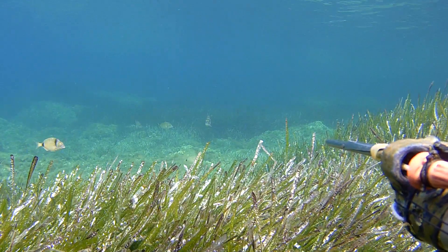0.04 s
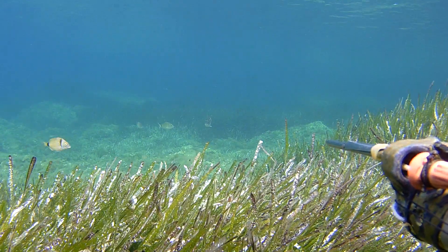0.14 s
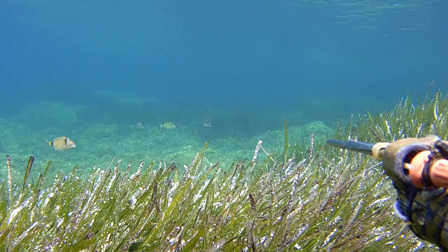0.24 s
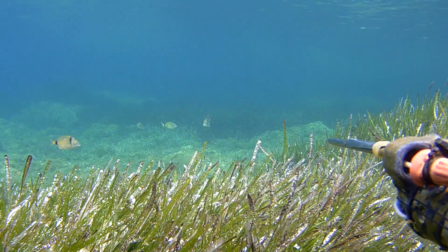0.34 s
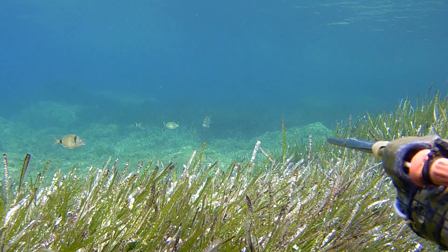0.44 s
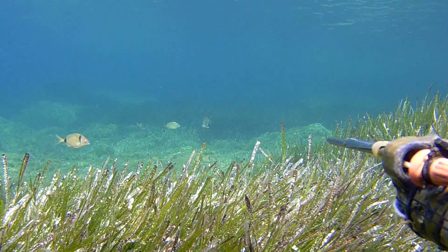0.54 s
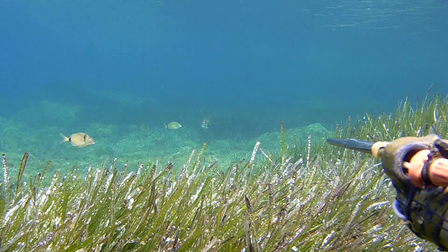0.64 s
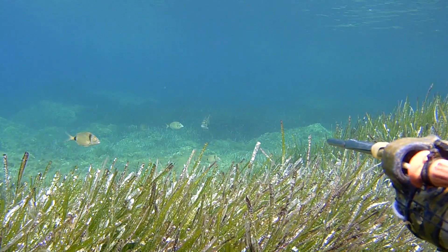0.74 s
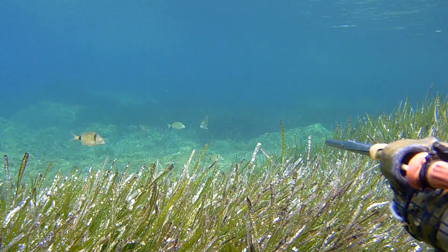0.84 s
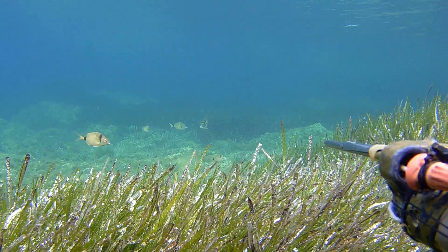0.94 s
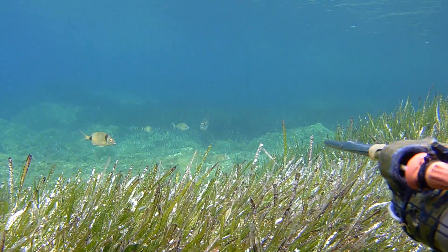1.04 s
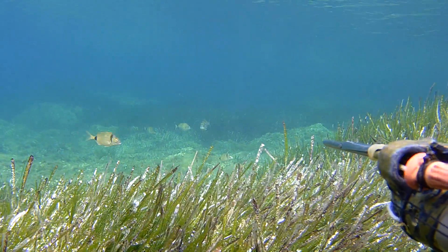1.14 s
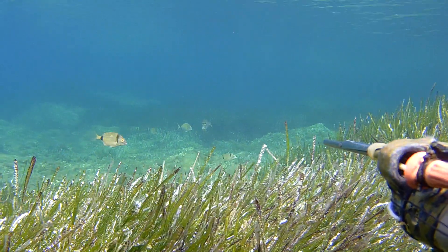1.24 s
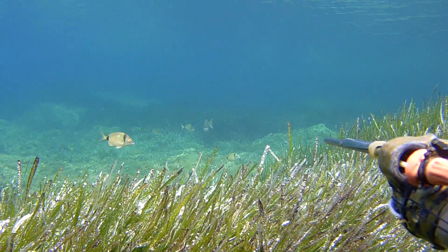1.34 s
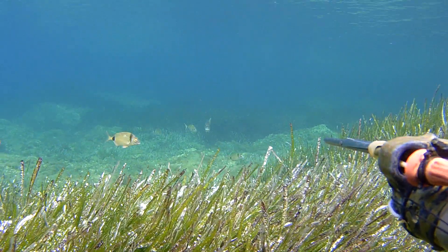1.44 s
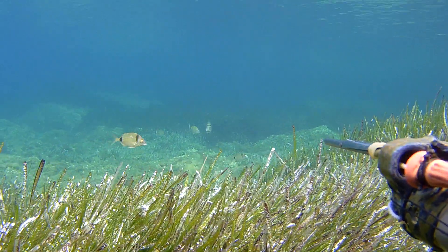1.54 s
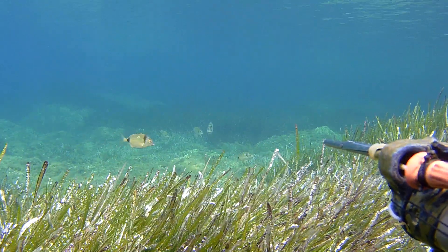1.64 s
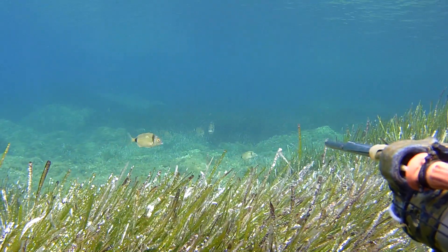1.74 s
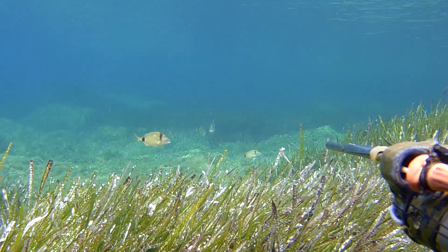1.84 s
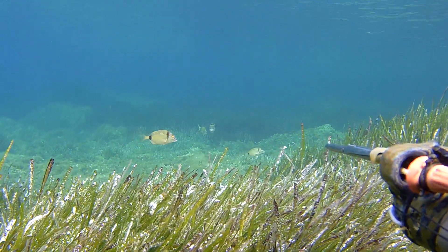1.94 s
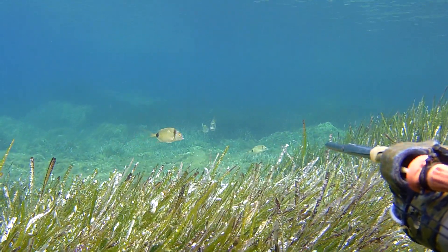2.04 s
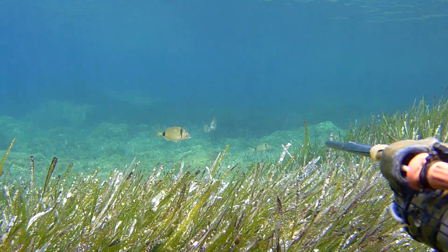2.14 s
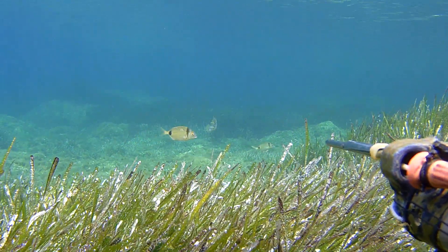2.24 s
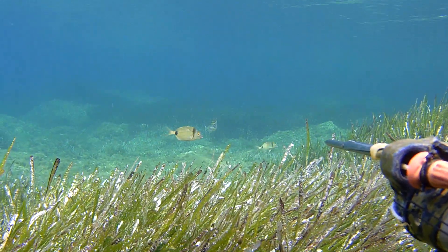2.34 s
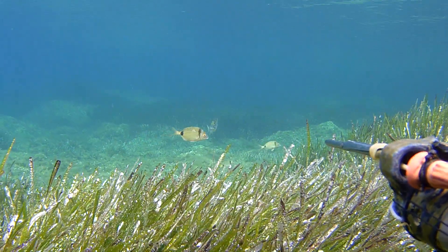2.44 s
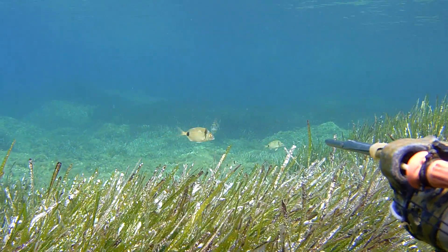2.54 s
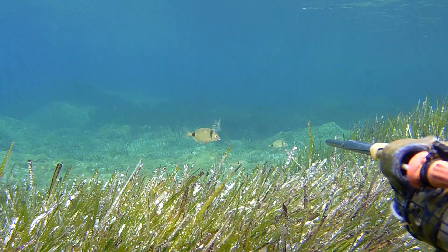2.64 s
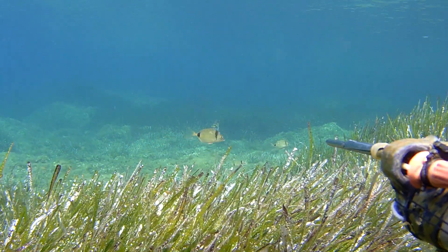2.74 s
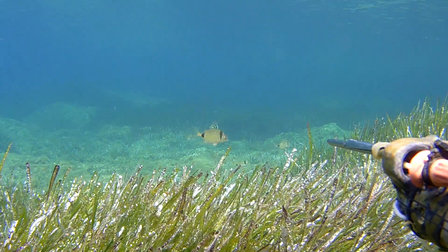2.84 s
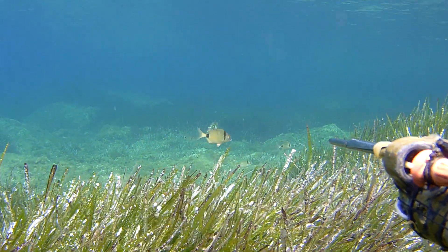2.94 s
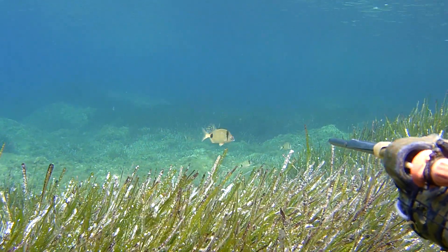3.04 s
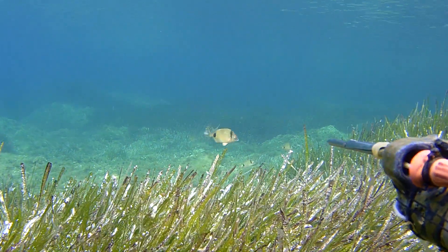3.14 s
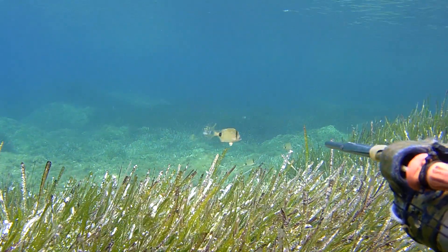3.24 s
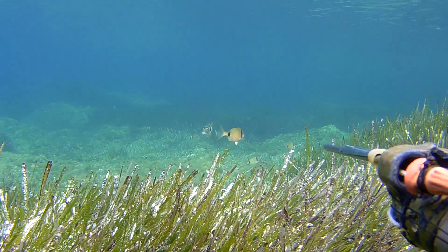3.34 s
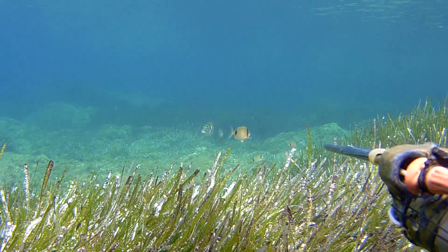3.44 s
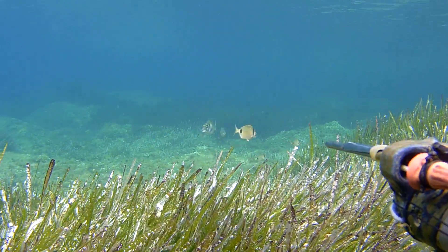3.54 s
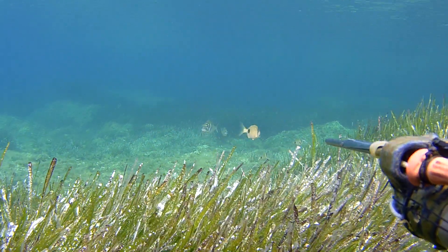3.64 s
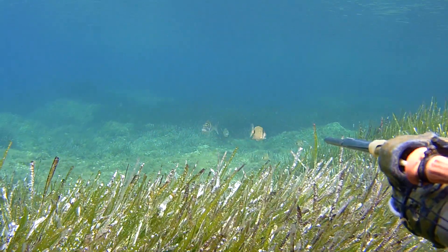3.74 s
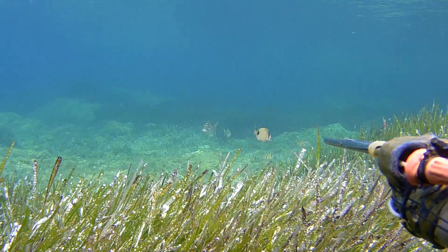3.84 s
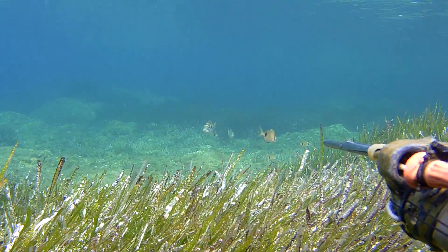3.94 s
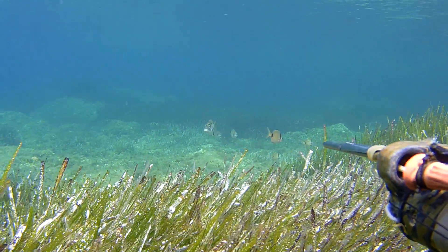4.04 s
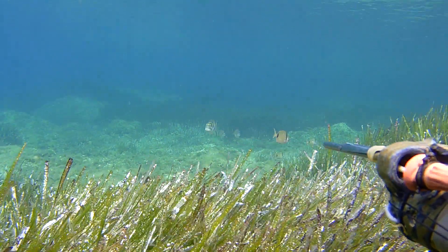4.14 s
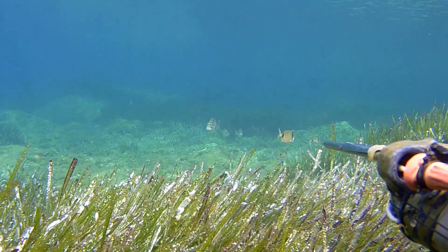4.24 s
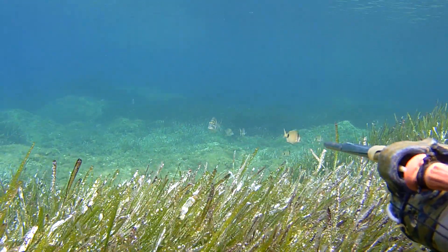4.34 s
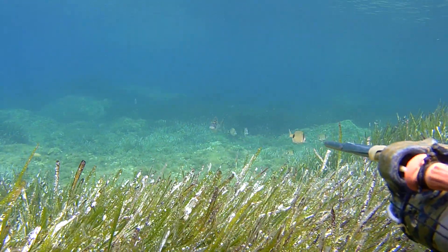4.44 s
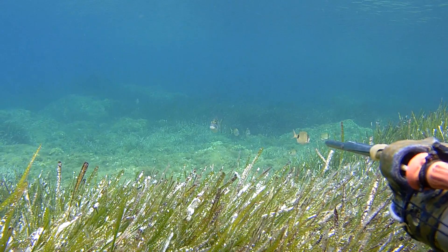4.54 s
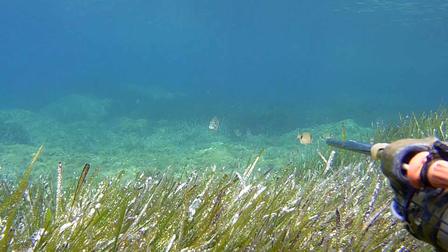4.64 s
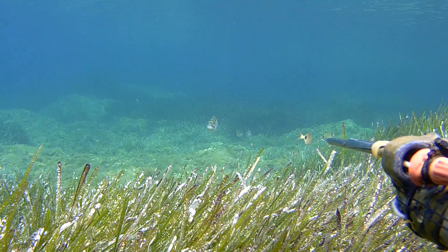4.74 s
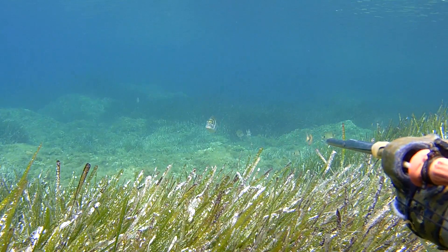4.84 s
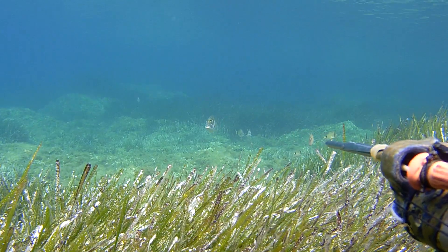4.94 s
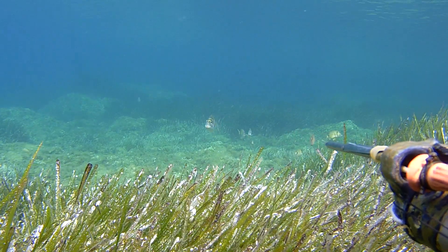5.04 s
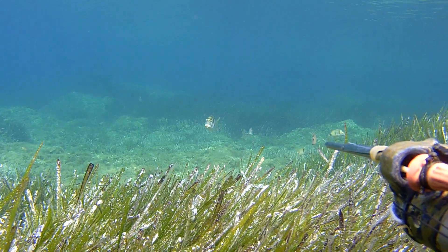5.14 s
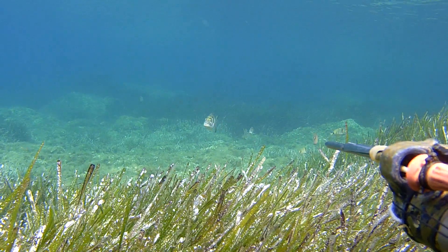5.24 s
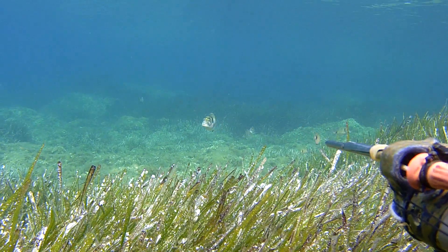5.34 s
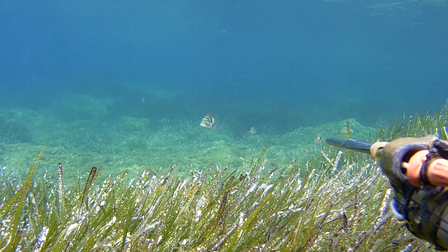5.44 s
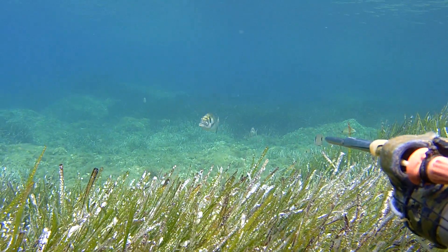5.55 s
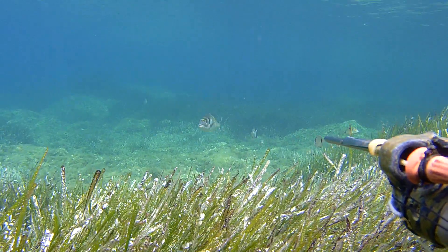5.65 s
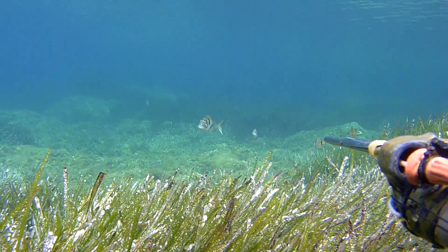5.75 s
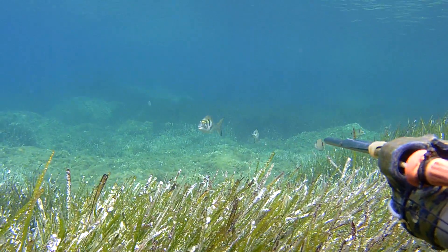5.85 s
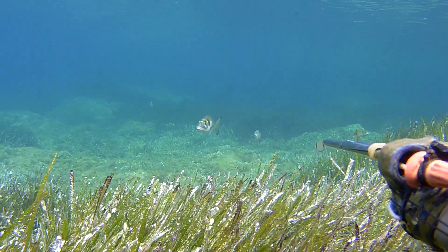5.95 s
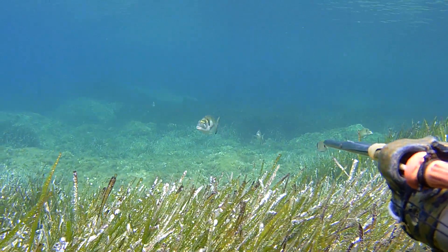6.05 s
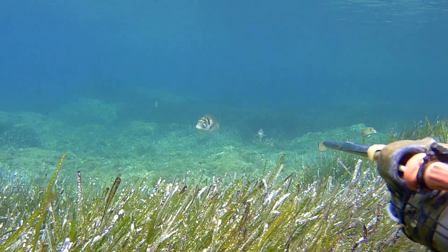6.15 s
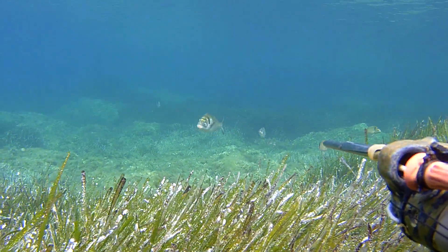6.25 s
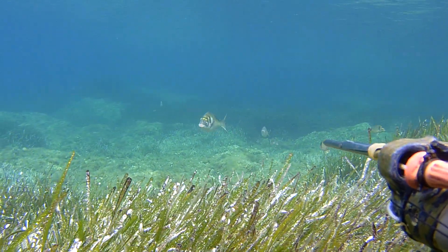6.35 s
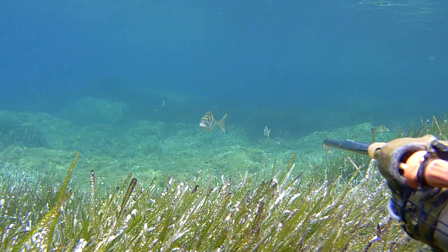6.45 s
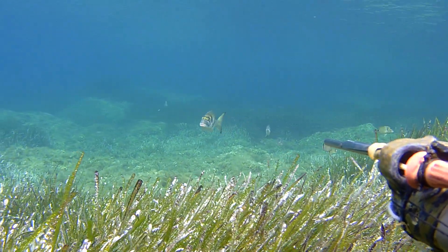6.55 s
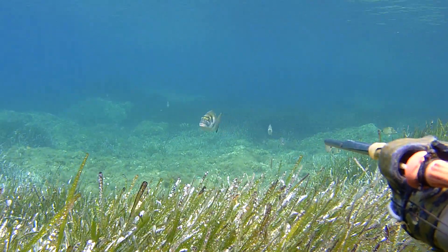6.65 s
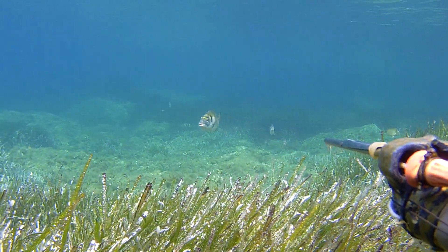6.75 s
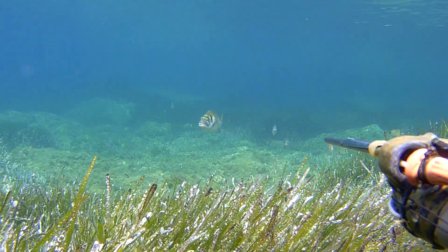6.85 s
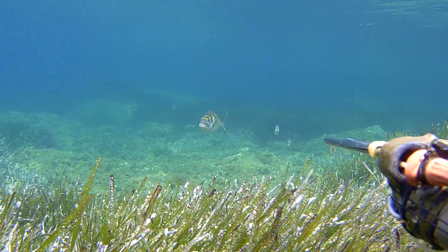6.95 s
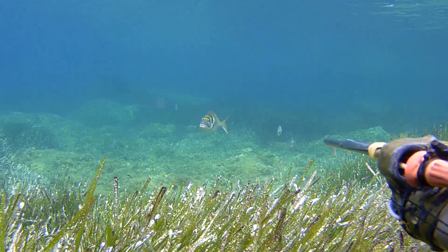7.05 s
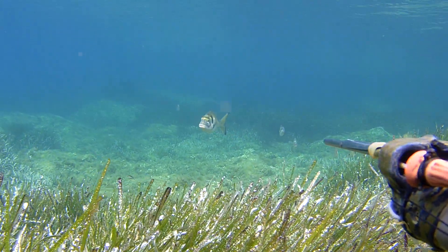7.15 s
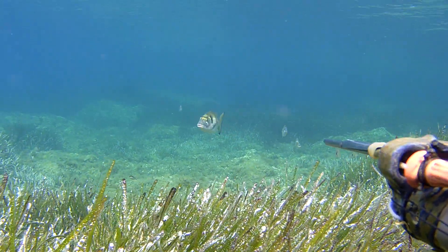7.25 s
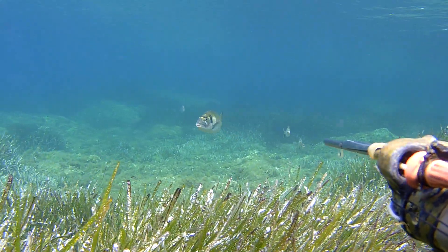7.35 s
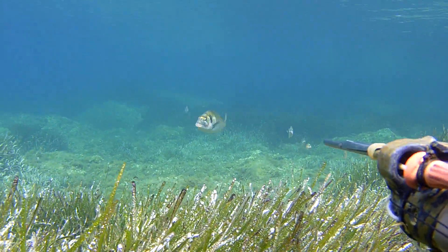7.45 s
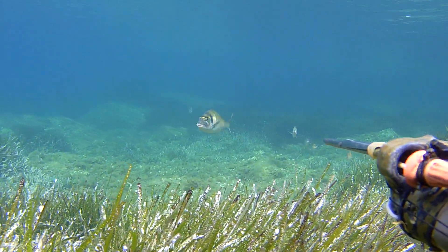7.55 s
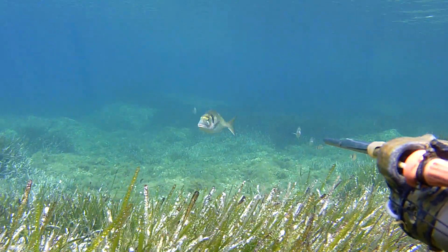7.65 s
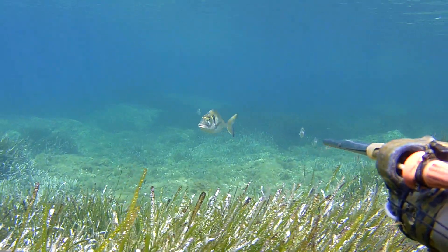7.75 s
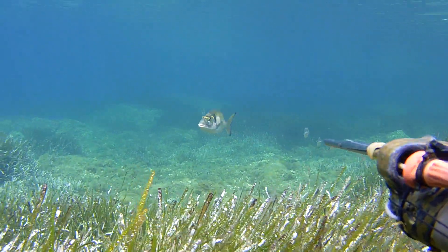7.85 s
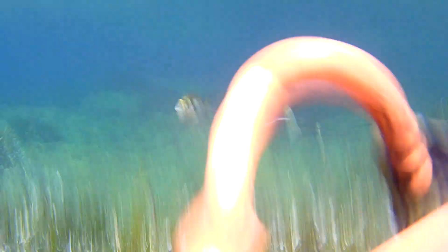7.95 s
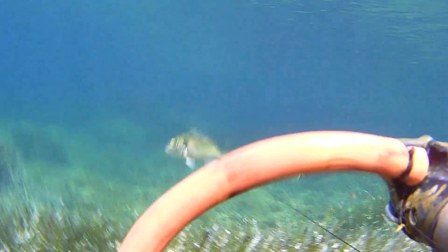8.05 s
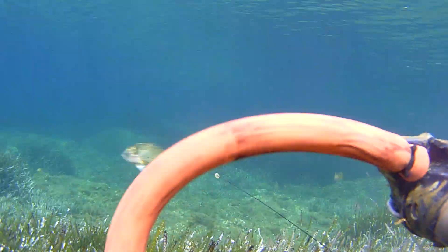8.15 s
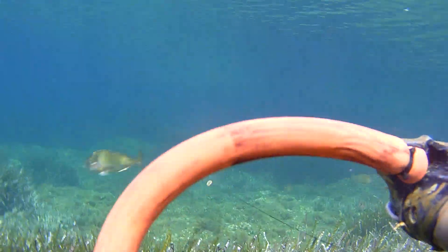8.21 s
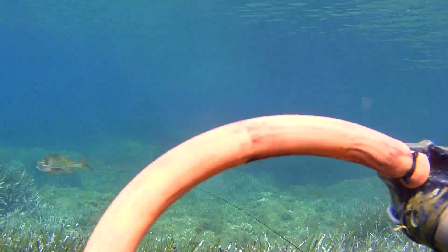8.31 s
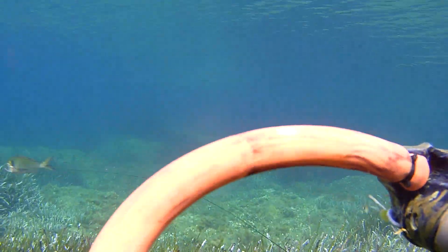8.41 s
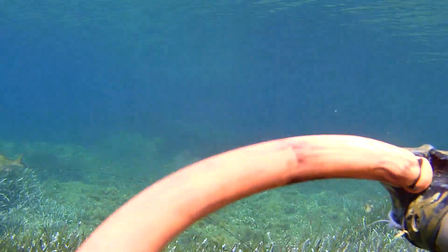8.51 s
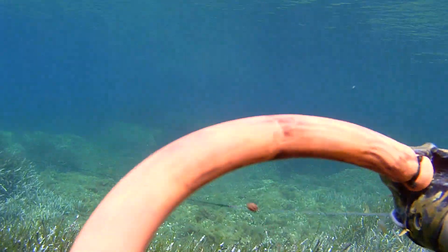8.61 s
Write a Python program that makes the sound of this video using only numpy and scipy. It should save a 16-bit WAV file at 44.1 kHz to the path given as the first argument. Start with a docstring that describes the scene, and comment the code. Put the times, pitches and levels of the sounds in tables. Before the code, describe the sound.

Underwater over seagrass, heard through a boxy camera housing on a speargun: dry shrimp clicks over a faint sizzle and soft wash, with dull hollow knocks in small groups. The knocks stop, the crackle goes on, then the gun fires with an abrupt, distorted crack and deep thump. Line rattles and slaps out, then jerks taut.

```python
"""Under water over a seagrass bed, heard from inside a camera housing on a speargun.
From the start shrimps snap (collapsing bubbles) over a far sizzle and wash; until 6.3 s hollow knocks
(soft pushes with rebounds) come in groups of about three. At about 7.95 s the gun fires: blows, scraping shaft
and recoil overload the microphone; the line then clatters out by stick and slip and jerks taut at 8.53 s.
All but the wash and the recoil ring the resonances of the housing."""
import sys
import numpy as np
from scipy import signal
from scipy.fft import rfft, irfft
from scipy.io import wavfile
from scipy.ndimage import uniform_filter1d

SR = 44100
rng = np.random.default_rng(int(sys.argv[2]) if len(sys.argv) > 2 else 0)


def waveform_to_disk(signal):
    """Save audio, clipped to [-1, 1], as 16-bit WAV at the path in sys.argv[1]."""
    frames = np.transpose(np.atleast_2d(signal))
    scaled = np.clip(frames, -1, 1) * 32767
    samples = np.round(scaled).astype(np.int16)
    wavfile.write(sys.argv[1], SR, samples)


N = 382788

# Event levels are peaks ahead of the microphone overload.
# blows of trigger, shaft, rubber and tightening line:
# (time [s], level [dB], overtones [dB], crack re blow [dB])
BLOWS = [(7.9438, -32, -10, -25), (7.949, 10, -6, -17), (7.9625, 7, -2, -19), (7.9705, 14, 3, -28),
         (7.984, 26, -12, -36), (8.003, 15, -1, -19), (8.015, 4, 3, -25), (8.0305, -9.5, 20, 4.5),
         (8.039, 3.5, 2.5, 0.5), (8.073, -6.5, 1, -17), (8.1125, 4, -13, -24), (8.119, -11, -9, -37),
         (8.532, 10, 3, -27), (8.5445, 2.5, 7.5, -19)]
# low modes of the gun: (frequency [Hz], 60 dB decay [s], initial level [dB])
GUN_MODES = [(88.9, 0.32, -4), (133.8, 0.283, -5), (163.4, 0.2, -5)]
# spurts in which the line runs out: (start [s], length [s], level [dB])
LINE_SPURTS = [(8.117, 0.058, -29.5), (8.249, 0.068, -35.5), (8.342, 0.056, -41), (8.387, 0.032, -38.5),
               (8.434, 0.061, -31.5), (8.57, 0.22, -43)]
# slaps of the running line: (time [s], level [dB], crack re slap [dB])
LINE_SLAPS = [(8.157, -23, -33), (8.251, -26.5, -9.5), (8.28, -22, -11.5), (8.3, -18, -20.5),
              (8.347, -23.5, -34), (8.359, -22.5, -32), (8.389, -16.5, -35), (8.405, -17.5, -35),
              (8.417, -18.5, -45), (8.453, -15, -26), (8.467, -13, -36), (8.478, -17.5, -40),
              (8.5, -17, -40), (8.509, -15, -33), (8.616, -17, -35), (8.663, -13, -25)]
# hollow knocks: (time [s], level [dB], overtones [dB], rebound share [1])
KNOCKS = [(0.12, -38, -1, 0.27), (0.239, -22, -6, 0.16), (0.358, -40.5, -8, .25), (0.38, -22.5, -5.5, 0.79),
          (0.553, -26.5, -8, .15), (0.6, -24, 4.5, .2), (1.005, -42, -3, .25), (1.026, -24, -7, 0.082),
          (1.157, -23, -1, 0.17), (1.33, -26.5, -7, 0.72), (1.785, -36.5, -2, 0.22),
          (1.897, -36.5, -1, .25), (1.903, -22, -12, .2), (1.975, -21, -7, 0.057), (2.133, -27, -10, 0.87),
          (2.698, -35.5, -9, 0.26), (2.731, -24, -5, 0.54), (2.89, -22.5, -4.5, 0.49),
          (2.952, -29.5, -11, 0.49), (3.501, -31, -7, .4), (3.62, -36.5, -13, 0.35),
          (3.656, -28.5, 0, 0.84), (3.816, -30, -9, 0.89), (4.374, -37, -14, 0.22),
          (4.391, -27.5, -9, 0.15), (4.427, -30, -10, 0.48), (4.589, -37.5, -32, 0.41),
          (4.63, -28.5, -13, .4), (4.737, -27.5, -6.5, 0.16), (5.221, -26, -12, 0.12),
          (5.338, -26.5, -3, .6), (5.489, -22, -6.5, .35), (5.729, -40.5, -14, 0.21),
          (6.321, -43, -13, .35)]
# near shrimp snaps: (time [s], level [dB], body [dB], sizzle [dB])
SNAPS = [(0.1326, -38, -7, 2), (0.22, -37, -9, 0), (0.4269, -38.5, -35, -5), (0.4554, -35, -32, -4),
         (0.6, -16, .5, -22.5), (0.7035, -29, -14, 0), (0.923, -36, -9, -12), (1.04, -38, -6, 4),
         (1.1779, -25, -11.5, -16), (1.2406, -34.5, -9, -1), (1.298, -37, -3, -6), (1.3058, -31.5, 2, -7),
         (1.4154, -21.5, -6, -12.5), (1.4864, -31, -6.5, -8), (1.615, -34, -19, -3),
         (1.7448, -33.5, -19, -10), (1.7914, -36, -33, -3), (1.833, -36.5, -2, 3), (1.9677, -34, -4.5, -7),
         (2.202, -34, -5.5, -1), (2.2712, -31.5, -21, -8), (2.5464, -19.5, -10, -9),
         (2.6845, -34.5, -11, -18), (2.7148, -33, -6, -12), (3.309, -36, -10, 3), (3.425, -32.5, -35, -5),
         (3.5982, -34.5, -8, -42), (3.642, -35, -4.5, -2), (3.761, -40.5, -20, -2), (4.0094, -33.5, -6, 1),
         (4.333, -32.5, -22, 1), (4.8655, -40, -25, -12), (5.1615, -36, -4, 1), (5.2523, -31.5, -8, 3),
         (5.643, -29.5, -10, -13), (5.7923, -29, -12, -6), (5.8492, -40, -16, -22), (6.119, -37.5, -19, -9),
         (6.189, -35.5, -14, -7), (6.32, -33.5, -11, -12), (6.33, -37, -30, -6), (6.685, -32.5, -10.5, -9),
         (6.9731, -31.5, -5, -3), (7.1642, -36.5, 0, -35), (7.2535, -30.5, -11, -32), (7.423, -37, -9, -45),
         (7.458, -36, 4, -7), (7.4733, -35, -3, -20), (7.7776, -39.5, -4, 7), (7.872, -36.5, -9, -5),
         (8.1998, -25.5, 8, -21), (8.5974, -31, -9, -7)]
# resonances of the housing: (frequency [Hz], width [Hz], level [dB])
HOUSING_MODES = [(150, 33.4, -1.5), (376.5, 28, -9), (523.2, 35, -3), (607.6, 41, -4), (746.7, 107, -1),
                 (900, 490, -17.5), (1176, 133, -7.5), (1489, 99, -5), (1689, 163, -8), (2276, 290, -17.5),
                 (2776, 140, -9.5), (3257, 660, -7.5), (3604, 97, -6.5), (4434, 264, -2.5), (6020, 350, -7),
                 (6610, 84, -10), (7340, 130, -16.5), (8750, 125, -9), (10160, 410, -21.5),
                 (12300, 640, -22), (14600, 2100, -40)]
# spectrum of a blow's force: (frequency [Hz], level [dB])
BLOW_FORCE = [(50, -4), (150, -11), (320, -0.5), (500, -3.5), (750, 1.5), (1200, 4.5), (1700, 0.5),
              (2500, 4), (3100, -30), (8000, -54)]
# spectrum of a metallic crack's force: (frequency [Hz], level [dB])
CRACK_FORCE = [(800, -39), (2000, 12), (3000, 1.5), (7000, -4.5), (15000, 2)]
# spectrum of slap, slip and scrape forces: (frequency [Hz], level [dB])
SLAP_FORCE = [(50, -8), (200, 0.5), (450, 0.5), (750, 4.5), (1100, 5.5), (1600, -7), (2280, -1.5),
              (2550, -17), (5000, -26), (15000, -50)]
# spectrum of the water churned by the recoil: (frequency [Hz], level [dB])
CHURN_SPECTRUM = [(10, -0.5), (33, 1.5), (58, -1.5), (90, -1.5), (133, 2.5), (200, -5.5), (260, -10.5),
                  (330, -11), (450, -15), (900, -41), (3000, -87)]
# spectrum of a knock's push: (frequency [Hz], level [dB])
KNOCK_FORCE = [(40, -11), (150, -8), (400, -6), (750, 4.5), (900, 3), (1700, -6), (2100, -48.5),
               (3000, -61)]
# spectrum of the low swell after a knock: (frequency [Hz], level [dB])
AFTER_SWELL_FORCE = [(15, 20), (30, 23.5), (55, 13.5), (100, -3.5), (160, -3.5), (260, -2), (380, -15),
                     (600, -44), (2000, -64)]
# spectrum of a near snap's force: (frequency [Hz], level [dB])
SNAP_FORCE = [(100, -45), (700, -4.5), (1700, 7.5), (3600, -3.5), (4700, -4.5), (16000, -4)]
# spectrum of far snaps' force: (frequency [Hz], level [dB])
FAR_SNAP_FORCE = [(100, -69), (700, 8), (1200, -8.5), (1700, 11), (4000, 3), (9000, 0.5), (16000, 8)]
# spectrum of the wash of the sea: (frequency [Hz], level [dB])
SEA_SPECTRUM = [(20, 2), (45, -3.5), (100, -5.5), (200, -5), (320, -6), (600, -10), (1100, -15),
                (1800, -20.5), (2400, -23), (4500, -27), (8000, -32), (15500, -33.5)]

KICK_S = 7.956  # the rubber throws the shaft forward and the gun back
TOP_HZ = 15750  # upper limit of the recorder
SIZE = 8192  # samples in one event
AGE_S, TIME_S = np.arange(SIZE) / SR, np.arange(N) / SR
FREQ_HZ = np.arange(1, SIZE // 2 + 2) * SR / SIZE  # one bin up, so that log(0) is avoided


def shot(body, scatter_s=0.0024):
    """Hard blows: a pulse with scatter drives the housing, plus a metallic crack."""
    out = np.zeros(N)
    blow_response, crack_response = body * colour(BLOW_FORCE), body * colour(CRACK_FORCE)
    for time_s, peak_db, overtones_db, crack_db in BLOWS:
        firmness = colour([(850, 0), (1450, overtones_db)])
        blow = strike(blow_response * firmness, scatter=0.7, scatter_s=scatter_s)
        crack = strike(crack_response, scatter=1.24, scatter_s=scatter_s)
        add(out, time_s, peak(blow, peak_db))
        add(out, time_s, peak(crack, peak_db + crack_db))
    return out


def shaft(body, scrape_db=-14.0, rattle_db=-21, run_s=0.13, rattle_delay_s=0.01, rattle_s=0.061,
          easing_db_per_s=55):
    """The shaft scrapes along the barrel, less as it leaves; its metal rattles while the rubber drives it."""
    contacts = grains(rate_hz=1600, spread_db=1.5)
    scrape = level(through(contacts, body * colour(SLAP_FORCE)), scrape_db)
    rattle = level(through(rng.standard_normal(N), body * colour(CRACK_FORCE)), rattle_db)
    easing = undb(-easing_db_per_s * np.maximum(TIME_S - KICK_S, 0))
    run = envelope(KICK_S, run_s, rise_s=0.002, fall_s=0.0081)
    drive = envelope(KICK_S + rattle_delay_s, rattle_s, rise_s=0.004, fall_s=0.0034)
    return scrape * easing * run + rattle * drive


def recoil(swing_hz=19.4, swing_db=-1, churn_db=-6.5, wake_db=-44):
    """The kick swings the gun, rings its low modes and churns the water, which stays stirred for a while."""
    age_s = np.maximum(TIME_S - KICK_S, 0)
    kick = envelope(KICK_S, hold_s=0.054, rise_s=0.0022, fall_s=0.033)
    wake = envelope(KICK_S, hold_s=0.62, rise_s=0.019, fall_s=0.1)
    swing = undb(swing_db) * np.sin(2 * np.pi * swing_hz * age_s)
    thump = np.zeros(N)
    for hz, t60_s, start_db in GUN_MODES:
        thump += undb(start_db - 60 * age_s / t60_s) * np.sin(2 * np.pi * hz * age_s)
    churn = level(through(rng.standard_normal(N), colour(CHURN_SPECTRUM)), 0)
    stirring = undb(churn_db) * kick + undb(wake_db) * wake
    return thump + swing * kick + churn * stirring


def line(body, slip_rate_hz=900, slip_spread_db=4.0, treble_db=-5, rise_s=0.0061, fall_s=0.015):
    """The line sticks and slips in spurts as it runs out, and its loops slap the barrel."""
    slap_response, crack_response = body * colour(SLAP_FORCE), body * colour(CRACK_FORCE)
    slips = grains(slip_rate_hz, slip_spread_db) * undb(2.4 * walk(170))
    slip_response = slap_response * colour([(2200, 0), (2700, treble_db)])
    pull = np.zeros(N)
    for start_s, length_s, spurt_db in LINE_SPURTS:
        pull += undb(spurt_db) * envelope(start_s, length_s, rise_s, fall_s)
    out = level(through(slips, slip_response), 0) * pull
    for time_s, peak_db, crack_db in LINE_SLAPS:
        add(out, time_s, peak(swell(slap_response, rise_s=0.0013), peak_db))
        add(out, time_s, peak(swell(crack_response, rise_s=0.0016), peak_db + crack_db))
    return out


def knocks(body, swell_db=-50, swell_share=0.62, rebound_s=0.00649):
    """Soft pushes with a rebound; firmer ones reach the overtones; a low after-swell grows more slowly."""
    out = np.zeros(N)
    push_response, low_response = body * colour(KNOCK_FORCE), body * colour(AFTER_SWELL_FORCE)
    faintest_db = min(row[1] for row in KNOCKS)
    for time_s, peak_db, overtones_db, rebound in KNOCKS:
        firmness = colour([(850, 0.0042), (1400, overtones_db)])
        delay_s = rebound_s * (1 + 0.099 * rng.standard_normal())
        double = 1 + rebound * np.exp(-2j * np.pi * FREQ_HZ * delay_s)
        knock = strike(push_response * firmness * double, scatter=0.71, scatter_s=0.0024)
        add(out, time_s, peak(knock, peak_db))
        after_db = swell_db + swell_share * (peak_db - faintest_db)
        add(out, time_s, peak(swell(low_response, rise_s=0.02), after_db))
    return out


def snaps(body):
    """The nearest shrimps, each with its own colour."""
    out, response = np.zeros(N), body * colour(SNAP_FORCE)
    for time_s, peak_db, body_db, sizzle_db in SNAPS:
        add(out, time_s, peak(snap(response, body_db, sizzle_db), peak_db))
    return out


def snap(response, body_db, sizzle_db, smear_s=0.00082, tail_db=-17):
    """One collapsing shrimp bubble, smeared by short paths over the seabed."""
    tinted = response * colour([(1800, body_db), (2900, 0.011), (3900, 0), (10000, sizzle_db)])
    direct = level(swell(tinted, rise_s=smear_s), 0)
    tail = level(strike(tinted, scatter=3.7, scatter_s=0.012), tail_db)
    return direct + tail


def colony(body, quiet_db=-52.5, spread_db=4.5, focus_db=9, nearest=0.028, count=560):
    """Shrimps further off snap at random, mostly faintly, each strongest in its own range of pitch."""
    out, response = np.zeros(N), body * colour(FAR_SNAP_FORCE)
    for when, distance, pitch in rng.random((count, 3)):
        hz = 1500 * 7 ** pitch
        focus = colour([(hz / 2, -focus_db), (hz, 0), (hz * 2, -focus_db)])
        peak_db = quiet_db - spread_db * np.log(distance + nearest)
        add(out, when * N / SR, peak(snap(response * focus, 0, 0), peak_db))
    return out


def seabed(body):
    """Countless far shrimps merge into a fine sizzle over the soft wash of the sea; both waver in level."""
    sizzle = through(grains(rate_hz=1100, spread_db=7.0), body * colour(FAR_SNAP_FORCE))
    wash = through(rng.standard_normal(N), colour(SEA_SPECTRUM))
    wavering_sizzle = level(sizzle, -71.0) * undb(7.1 * walk(40))
    wavering_wash = level(wash, -56.0) * undb(1.0 * walk(5.4))
    return wavering_sizzle + wavering_wash


def housing():
    """Frequency response of the housing: the sum of its resonances."""
    f = np.maximum(FREQ_HZ - FREQ_HZ[0], 1)
    return sum(undb(db) / (1 + 1j * (f * f - hz * hz) / (f * width_hz))
               for hz, width_hz, db in HOUSING_MODES)


def strike(response, scatter, scatter_s):
    """One pulse and its quickly fading scatter, rung through a response."""
    force = rng.standard_normal(SIZE) * np.exp(-AGE_S / scatter_s)
    force *= scatter / np.linalg.norm(force)
    force[0] += 1
    return ring(rfft(force) * response)


def swell(response, rise_s):
    """A noisy force that builds and dies away, rung through a response."""
    force = rng.standard_normal(SIZE) * (AGE_S / rise_s) ** 2 * np.exp(-2 * AGE_S / rise_s)
    return ring(rfft(force) * response)


def grains(rate_hz, spread_db):
    """Randomly timed pulses of uneven size and random sign."""
    hits = rng.random(N) < rate_hz / SR
    signs = rng.choice([-1, 1], N)
    return hits * signs * undb(spread_db * np.minimum(rng.exponential(size=N), 4))


def walk(rate_hz):
    """Random levels held 1 / rate_hz and slewed twice; spread near 1."""
    hold = int(SR / rate_hz)
    steps = np.repeat(rng.standard_normal(N // hold + 1), hold)
    return 0.95 * uniform_filter1d(uniform_filter1d(steps, hold), hold)[:N]


def envelope(start_s, hold_s, rise_s, fall_s):
    """Exponential attack up to the start, a hold, an exponential release."""
    before_s = np.maximum(start_s - TIME_S, 0)
    after_s = np.maximum(TIME_S - start_s - hold_s, 0)
    return np.exp(-before_s / rise_s - after_s / fall_s)


def colour(points):
    """Causal (minimum-phase) frequency response through (frequency [Hz], level [dB]) points."""
    hz, db = np.transpose(points)
    cepstrum = irfft(np.log(undb(np.interp(np.log(FREQ_HZ), np.log(hz), db))))
    cepstrum[1:SIZE // 2] *= 2
    cepstrum[SIZE // 2 + 1:] = 0
    return np.exp(rfft(cepstrum))


def ring(spectrum):
    """The sound of a spectrum, faded to silence over its last quarter."""
    return irfft(spectrum) * np.minimum(1, 4 * (1 - AGE_S / AGE_S[-1]))


def through(x, response):
    """Filter a long signal."""
    return signal.fftconvolve(x, ring(response))[:N]


def add(out, time_s, sound):
    """Mix a sound in at a time."""
    start = int(time_s * SR)
    out[start:start + SIZE] += sound[:N - start]


def undb(db):
    """Decibels to gain."""
    return 10 ** (np.asarray(db) / 20)


def peak(x, db):
    """Scale to a peak level."""
    return x * undb(db) / np.abs(x).max()


def level(x, db):
    """Scale to an rms level."""
    return x * undb(db) / x.std()


def scene():
    """Sum of all sources at the microphone, as one channel."""
    body = housing()
    gun = shot(body) + shaft(body) + recoil() + line(body)
    sea_life = knocks(body) + snaps(body) + colony(body)
    return (gun + sea_life + seabed(body))[None]


def overload(x, ceiling=0.32, knee=6):
    """Press a signal flat against a ceiling."""
    return x / (1 + np.abs(x / ceiling) ** knee) ** (1 / knee)


def record(dry, ripple_share=0.09, ripple_hz=1800):
    """The microphone overloads into flat tops with a little treble riding; the recorder softens and cuts the top."""
    highpass = signal.butter(2, ripple_hz, "high", fs=SR, output="sos")
    treble = signal.sosfiltfilt(highpass, dry)
    riding = overload(dry - treble) + overload(treble)
    clipped = (1 - ripple_share) * overload(dry) + ripple_share * riding
    softened = through(clipped[0], colour([(3000, 0.22), (8000, 0.6), (16000, -3.5)]))
    top_cut = signal.ellip(10, 0.2, 80, TOP_HZ, fs=SR, output="sos")
    return signal.sosfilt(top_cut, softened)[None]


dry = scene()
out = record(dry)
waveform_to_disk(out)
```